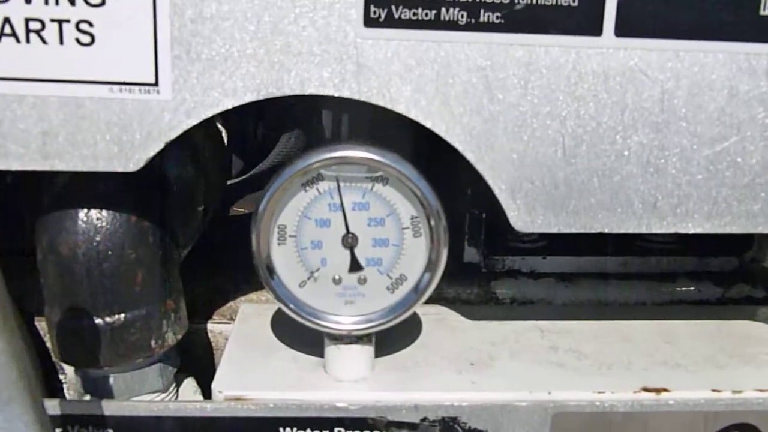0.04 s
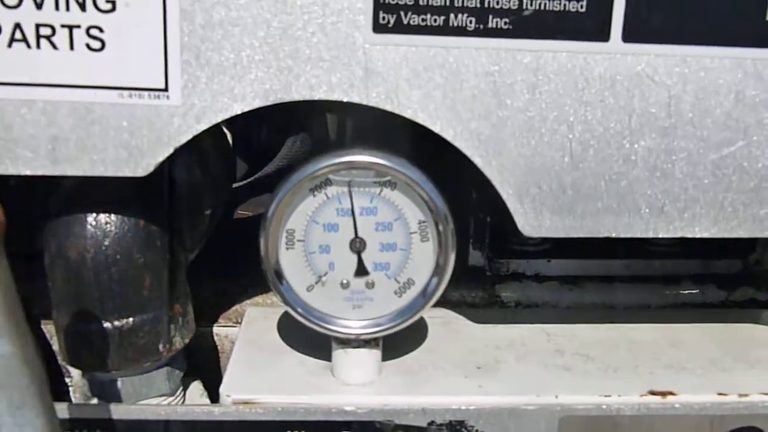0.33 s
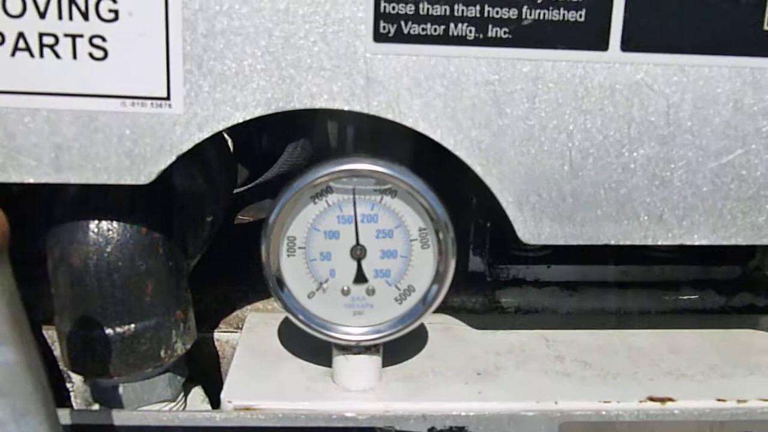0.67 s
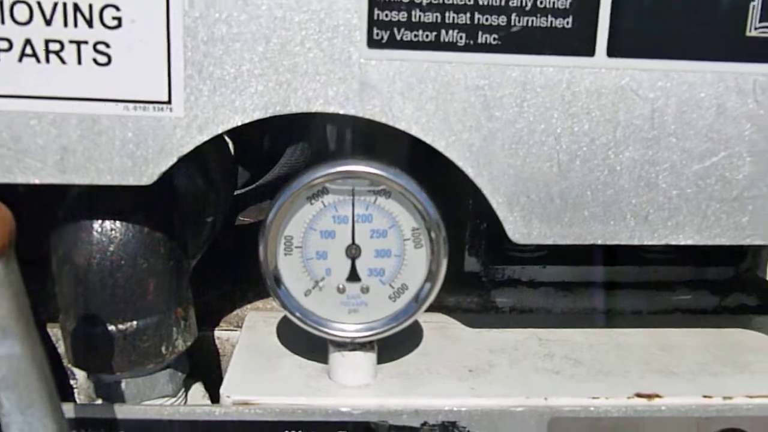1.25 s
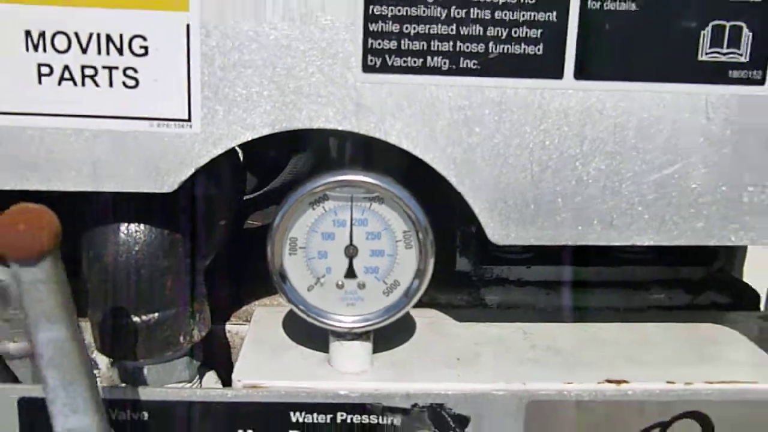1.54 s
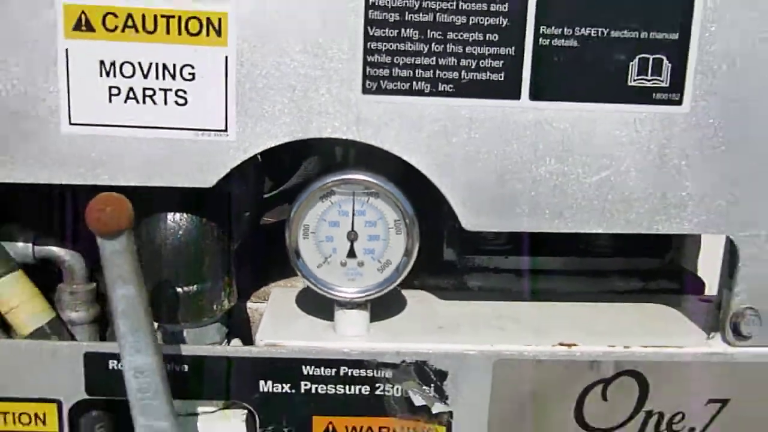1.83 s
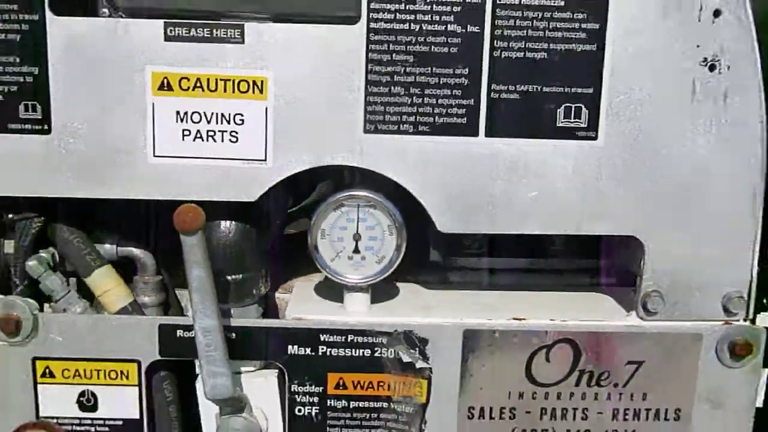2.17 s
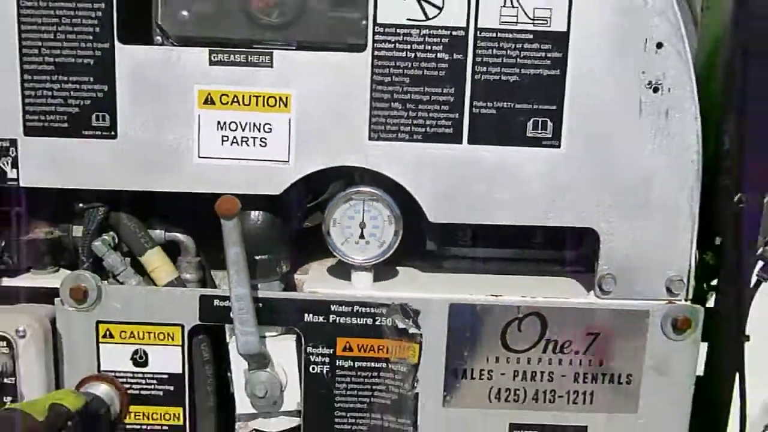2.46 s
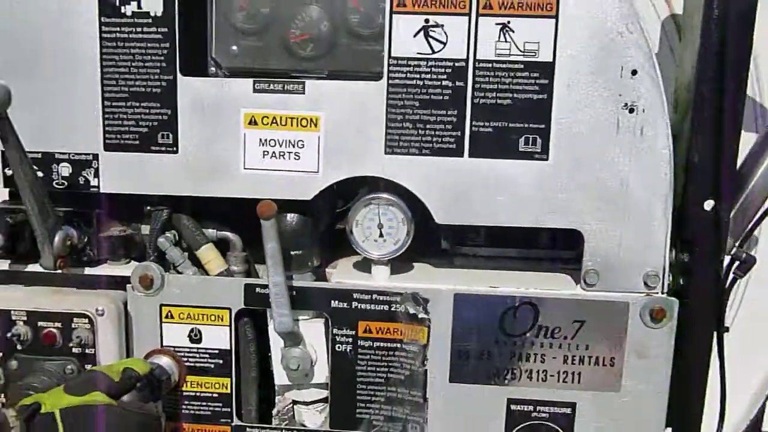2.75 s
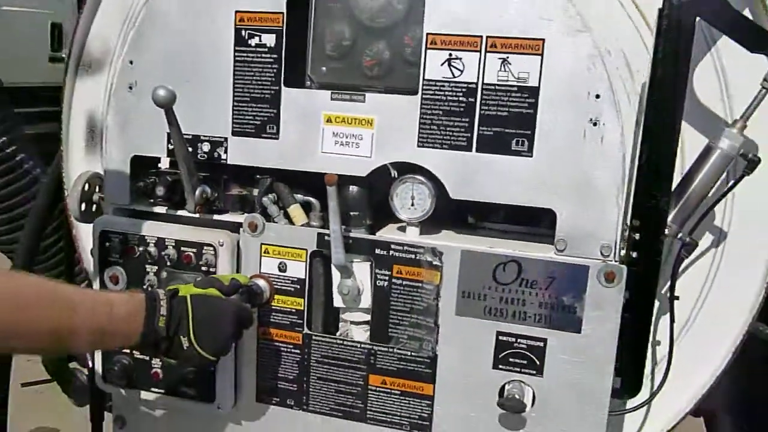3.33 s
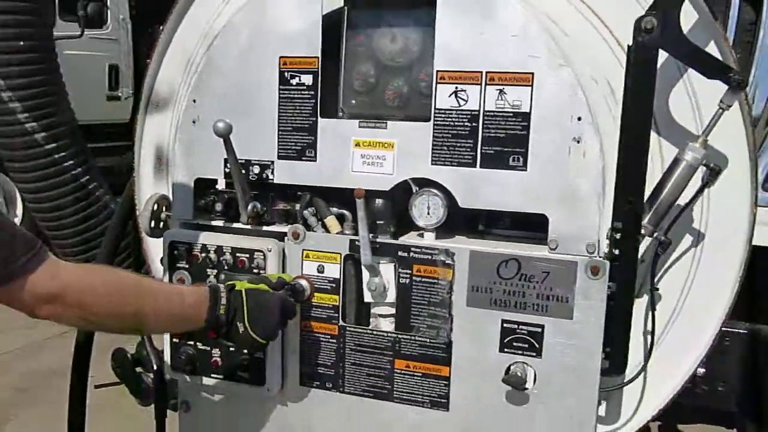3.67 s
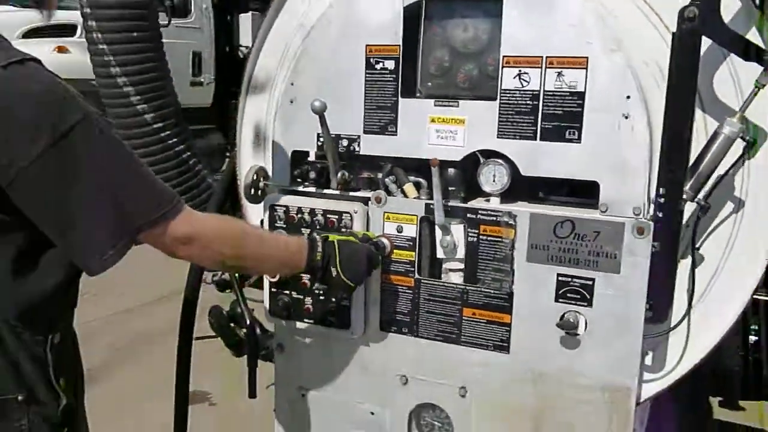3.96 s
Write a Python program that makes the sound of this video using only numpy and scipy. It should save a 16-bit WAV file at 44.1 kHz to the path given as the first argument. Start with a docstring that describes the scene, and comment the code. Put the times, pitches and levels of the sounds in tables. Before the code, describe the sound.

A diesel truck engine runs fast and close, with a roaring fan and whining pump.

```python
"""A six-cylinder diesel truck engine runs fast outdoors, close by, driving a pump and a fan.
From the start its firings hum and clatter, gears whine, the pump whistles, the fan hums and roars,
and hissing air makes the metalwork ring. From about 2 s the hiss grows brighter as the listener
steps back from the truck's end panel. Near 2.7 s the engine speeds up briefly, then settles,
and the whistles fade toward the end."""
import sys
import numpy as np
from scipy import signal
from scipy.fft import rfft, irfft
from scipy.io import wavfile
from scipy.ndimage import uniform_filter1d

SR = 44100
rng = np.random.default_rng(int(sys.argv[2]) if len(sys.argv) > 2 else 0)


def dump_mix(stems):
    """Bounce the given channels to the path in sys.argv[1] as a 16-bit WAV at rate SR."""
    frames = np.atleast_2d(stems).T  # one column per channel
    limited = np.clip(frames, -1, 1)  # hard clip at full scale
    pcm = np.round(limited * 32767).astype(np.int16)
    wavfile.write(sys.argv[1], SR, pcm)


N = 176400
TIME = np.arange(N) / SR

# Tone colour of the steady air hiss: (frequency [Hz], relative level [dB])
HISS_COLOUR = [(800, -18), (1700, 1.5), (2400, -2.5), (3600, -1), (4500, -3), (5800, -4), (6600, -3.5),
               (7300, -10.5), (8000, -16), (8700, -36.5)]
# Metalwork rung by the hiss: (frequency [Hz], width [Hz], level [dB])
METAL_RINGS = [(1730, 140, -50.5), (1930, 53, -50.5), (2990, 150, -54.5), (4200, 320, -51.5),
               (5110, 250, -51)]
# The ringing grows a little, then eases: (time [s], level change [dB])
RING_CHANGE = [(0, -2.5), (1.9, -1.5), (2.6, 0), (2.95, 2), (3.33, 1.5), (3.55, 2), (4, 0)]
# Bright hiss from behind the panel: (frequency [Hz], relative level [dB])
BRIGHT_HISS_COLOUR = [(1200, -15), (2300, 1), (2900, 7.5), (3600, 0), (4600, 4), (5600, -3.5), (6500, -11),
                      (8500, -22.5)]
# It comes through as the listener steps back: (time [s], level [dB])
BRIGHT_HISS_LEVEL = [(0, -55), (1.0, -52.5), (1.9, -60), (2.4, -45.5), (2.8, -41.5), (2.92, -41.5),
                     (3.17, -41), (3.25, -43), (3.33, -38.5), (3.4, -46), (3.52, -37), (3.63, -43),
                     (3.72, -40), (3.9, -42), (4, -45)]
# The sizzling top of the hiss: (frequency [Hz], relative level [dB])
TOP_HISS_COLOUR = [(4000, -13), (5700, 0.5), (6900, 3.5), (7500, -3.5), (8200, -14), (8700, -30.5)]
# It comes through too: (time [s], level [dB])
TOP_HISS_LEVEL = [(0, -59), (1.85, -62), (2.15, -49), (2.4, -46), (3.0, -45), (3.55, -48.5), (4, -52)]
# Thin whistles of the pump: (frequency [Hz], level [dB])
PUMP_WHISTLES = [(2548, -55.5), (2977, -59.5), (3892, -61.5), (4135, -60.5), (5050, -58)]
# They fade as the listener steps back: (time [s], level change [dB])
WHISTLE_CHANGE = [(0, -1), (.5, 3), (1.2, -1), (2.3, 0), (4, -5)]
# Air rushing through the fan: (frequency [Hz], relative level [dB])
RUSH_COLOUR = [(250, -17), (520, -3), (700, 1.5), (880, -3.5), (1160, -4.5), (1480, -13), (2000, -13.5),
               (3000, -22.5), (8000, -52)]
# Fan and engine heard through the bodywork: (frequency [Hz], relative level [dB])
ROAR_COLOUR = [(25, -49.5), (40, -32.5), (70, -19), (100, -8.5), (135, -5.5), (190, -2.5), (250, 1),
               (340, -0.9), (520, -8.5), (720, -14), (1000, -20), (2000, -34.5), (8000, -69)]
# The fan's deep roar: (time [s], relative level [dB])
FAN_ROAR_LEVEL = [(0, -21), (.22, -22.5), (.42, -22.5), (.58, -23), (.95, -22.5), (1.45, -24), (1.58, -23),
                  (1.83, -23), (1.97, -24.5), (2.15, -20), (2.32, -23.5), (2.8, -24.5), (3.2, -23.5),
                  (3.55, -25.5), (3.75, -23), (4, -24)]
# A low boom heard close to the panel: (time [s], level [dB])
PANEL_BOOM_LEVEL = [(0, -41), (.45, -26.5), (.9, -31.5), (1.2, -31.5), (1.8, -28.5), (2.1, -40),
                    (2.7, -29.5), (4, -45.5)]
# The hum of the fan blades: (time [s], level [dB])
BLADE_HUM_LEVEL = [(0, -29.5), (.38, -42), (.65, -30.5), (.95, -29.5), (2.2, -31), (2.45, -39), (2.85, -46),
                   (3.05, -42), (3.28, -26.5), (3.52, -34.5), (4, -30)]
# A low drone tone and two gear whines, changing with where the listener stands: (time [s], level [dB])
LOW_DRONE_LEVEL = [(0, -40), (.35, -30.5), (.85, -37), (1.05, -43), (1.8, -31.5), (2.0, -36.5),
                   (2.52, -37.5), (2.7, -30), (3.0, -37.5), (3.33, -34), (3.6, -47), (4, -37)]
MID_WHINE_LEVEL = [(0, -41), (.2, -49.5), (.45, -41), (.95, -42.5), (1.7, -40.5), (2.55, -40.5), (2.8, -46),
                   (3.4, -45), (3.8, -37), (4, -59)]
HIGH_WHINE_LEVEL = [(0, -49), (.6, -48), (1.7, -55), (2.1, -46.5), (2.65, -50), (2.9, -58.5), (3.45, -43.5),
                    (3.7, -48), (4, -48)]
# Clatter of the firings: (frequency [Hz], relative level [dB])
CLATTER_COLOUR = [(200, -22.5), (500, 3.5), (900, 0), (1500, -2.5), (2200, -13), (4000, -22), (7000, -42),
                  (8700, -60.5)]
# Clatter, rush and hiss swell and sink together: (time [s], level change [dB])
SHARED_SWELL = [(0, 1), (.2, 0.2), (.33, 2.1), (.6, 1.2), (.8, -1), (1.05, 1), (1.3, -0.3), (1.5, .5),
                (1.75, .4), (1.92, -0.8), (2.1, -0.1), (2.9, -0.56), (3.33, 0.7), (3.57, -1.6), (3.82, 2.1),
                (4, 2)]
# Pitches of the engine's steady tones: (order [vibrations per engine cycle])
HUM_ORDERS = [6, 12, 14, 24, 75, 93, 111, 186]
# How strong each of those tones is: (level [dB])
HUM_LEVELS = [-52.5, -44, -46, -37, -57.5, -49.5, -51.5, -50.5]
# How fast the engine turns: (time [s], speed [turns per minute])
ENGINE_SPEED = [(0, 1256), (.3, 1272), (.8, 1289), (1.5, 1294), (2.42, 1291), (2.65, 1338), (2.8, 1334),
                (3.0, 1298), (3.2, 1281), (3.6, 1273), (4, 1297)]


def from_db(db):
    """Turn decibels into a number to multiply a sound by."""
    return 10 ** (np.asarray(db) / 20)


def rms_one(x):
    """Scale a sound so that its average strength (rms) is 1."""
    return x / np.sqrt(np.mean(x ** 2) + 1e-20)


def in_time(rows):
    """Join (time, value) rows with straight lines, giving a value for every sample."""
    return np.interp(TIME, *np.transpose(rows))


def gain_at(spectrum, hz):
    """Read a (frequency, level) table as a multiplier at the given frequencies."""
    points, db = np.transpose(spectrum)
    return from_db(np.interp(np.log(hz + 1e-6), np.log(points), db))


def colour(x, spectrum):
    """Shape a sound's lows and highs with a (frequency, level) table; strength 1."""
    bins = rfft(x)
    hz = np.arange(len(bins)) * SR / N
    return rms_one(irfft(bins * gain_at(spectrum, hz), N))


def noise(spectrum):
    """Noise with the given tone colour; strength 1."""
    return colour(rng.standard_normal(N), spectrum)


def drift(rate_hz):
    """A slow random wobble, about 1 in size, worked out every 100 samples."""
    r = np.exp(-200 * np.pi * rate_hz / SR)
    slow = signal.lfilter([1], [1, -2 * r, r * r], rng.standard_normal(N // 100 + 1002))[1000:]
    return np.interp(np.arange(N) / 100, np.arange(len(slow)), rms_one(slow))


def steady(x, window_s=.12):
    """Even out the slow random swells of a noise; strength 1."""
    return x / np.sqrt(uniform_filter1d(x ** 2, int(window_s * SR)) + 1e-20)


def resonate(x, hz, width_hz):
    """Make a sound ring at one pitch; a narrower width rings longer."""
    r = np.exp(-np.pi * width_hz / SR)
    return signal.lfilter([1, 0, -1], [1, -2 * r * np.cos(2 * np.pi * hz / SR), r * r], x)


def tone(cycles, order):
    """A slightly unsteady tone that vibrates `order` times per engine cycle; strength 1."""
    wobbly_cycles = np.cumsum(np.gradient(cycles) * (1 + .0008 * drift(7.7)))
    wave = np.sin(2 * np.pi * (order * wobbly_cycles + rng.random()))
    return rms_one(wave * from_db(.5 * drift(2.6)))


def air_hiss():
    """Air hisses and rings the metalwork; the panel blocks the brighter hiss at first."""
    rings = sum(from_db(db) * rms_one(resonate(noise(HISS_COLOUR), hz, width))
                for hz, width, db in METAL_RINGS)
    bright = from_db(in_time(BRIGHT_HISS_LEVEL)) * noise(BRIGHT_HISS_COLOUR)
    sizzle = from_db(in_time(TOP_HISS_LEVEL)) * noise(TOP_HISS_COLOUR)
    hiss = from_db(-41) * noise(HISS_COLOUR)
    return hiss + from_db(in_time(RING_CHANGE)) * rings + bright + sizzle


def pump_whistles(width_hz=65, waver_db=2):
    """Flow through the pump sings at a few pitches, each swelling and fading on its own."""
    whistles = 0
    for hz, db in PUMP_WHISTLES:
        flow = rng.standard_normal(N)
        whistle = resonate(resonate(flow, hz, width_hz), hz, width_hz)
        whistles += from_db(db) * rms_one(whistle * from_db(waver_db * drift(4.2)))
    return from_db(in_time(WHISTLE_CHANGE)) * whistles


def fan_rush():
    """Air rushes through the fan as a mid-pitched noise."""
    return from_db(-31) * noise(RUSH_COLOUR)


def fan_hum_and_roar(cycles, blade_order=19.49):
    """The blades hum, with a weaker octave above; churning air roars and booms in the bodywork."""
    blades = tone(cycles, blade_order) + from_db(-10) * tone(cycles, 2 * blade_order)
    roar = from_db(in_time(FAN_ROAR_LEVEL) - 2) * steady(noise(ROAR_COLOUR))
    boom = steady(resonate(noise(ROAR_COLOUR), hz=139.4, width_hz=53))
    return from_db(in_time(BLADE_HUM_LEVEL)) * blades + roar + from_db(in_time(PANEL_BOOM_LEVEL)) * boom


def gear_whine(cycles, mid_order=87):
    """The pump's gears whine at two pitches over a low drone tone; a close tone on each side makes the middle
    one flutter."""
    side_tones = tone(cycles, mid_order - 1) + tone(cycles, mid_order + 1)
    middle = from_db(in_time(MID_WHINE_LEVEL)) * (tone(cycles, mid_order) + from_db(-5) * side_tones)
    low = from_db(in_time(LOW_DRONE_LEVEL)) * tone(cycles, order=43)
    high = from_db(in_time(HIGH_WHINE_LEVEL)) * tone(cycles, order=194)
    return low + middle + high


def engine_clatter(cycles, cylinders=6, decay_s=.0066):
    """Each firing sets off a short rattle in the engine block; some cylinders knock harder."""
    firings = cycles * cylinders
    cylinder = firings.astype(int) % cylinders
    since_firing_s = (firings % 1) / (np.gradient(firings) * SR)
    cylinder_db = 5.5 * rng.uniform(-0.87, 1, cylinders)
    knocks = rng.standard_normal(N) * from_db(cylinder_db[cylinder]) * np.exp(-since_firing_s / decay_s)
    return from_db(-39) * colour(knocks, CLATTER_COLOUR)


def engine_drone(cycles, harmonics=200, wave_samples=8192):
    """Every cycle repeats the same pressure wave, making a drone; a few tones stand out as a hum."""
    hz = np.arange(harmonics) * cycles[-1] * SR / N  # multiples of the average cycle rate
    phases = np.exp(2j * np.pi * rng.random(harmonics))
    wave = irfft(gain_at(ROAR_COLOUR, hz) * phases * (hz > 0), wave_samples)
    drone = rms_one(np.interp(cycles % 1, np.arange(wave_samples) / wave_samples, wave))
    hum = sum(from_db(db) * tone(cycles, order) for order, db in zip(HUM_ORDERS, HUM_LEVELS))
    return from_db(-33) * drone + hum


def scene():
    """Add all the sounds into one channel; engine, gears and fan turn together."""
    cycles = np.cumsum(in_time(ENGINE_SPEED)) / (2 * 60 * SR)  # engine cycles so far, two turns each
    noises = engine_clatter(cycles) + fan_rush() + air_hiss()
    swell = from_db(in_time(SHARED_SWELL) + .5 * drift(4.1))  # with a slight flutter
    machinery = engine_drone(cycles) + gear_whine(cycles) + fan_hum_and_roar(cycles) + pump_whistles()
    return (machinery + swell * noises)[None]


def record(dry, cutoff_hz=8700):
    """Cut away the highest treble steeply."""
    return signal.sosfilt(signal.ellip(10, .1, 80, cutoff_hz, fs=SR, output="sos"), dry)


dry = scene()
out = record(dry)
dump_mix(out)
```